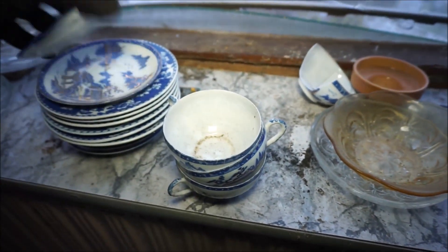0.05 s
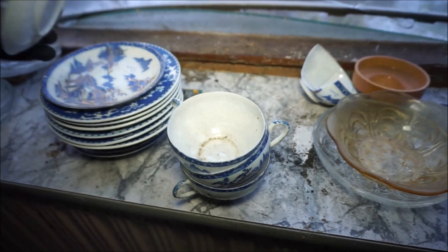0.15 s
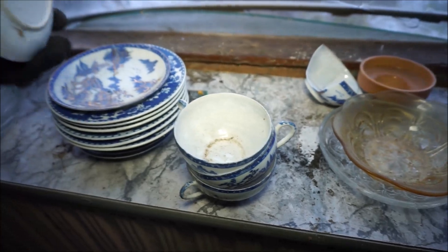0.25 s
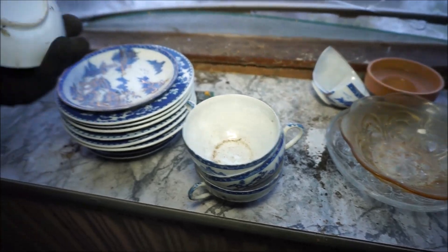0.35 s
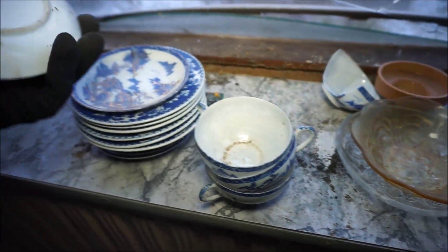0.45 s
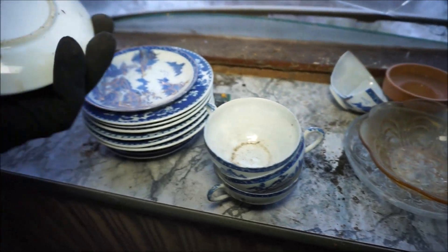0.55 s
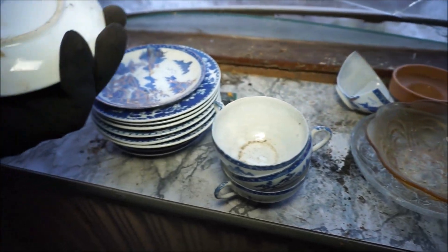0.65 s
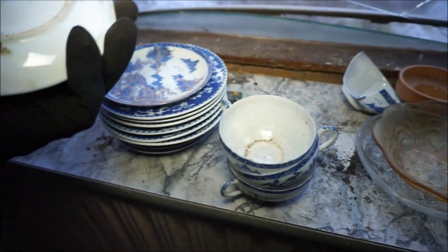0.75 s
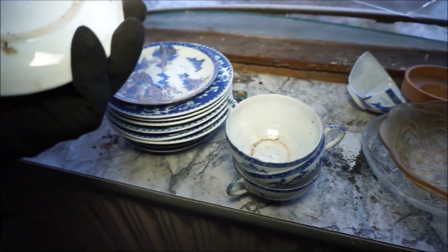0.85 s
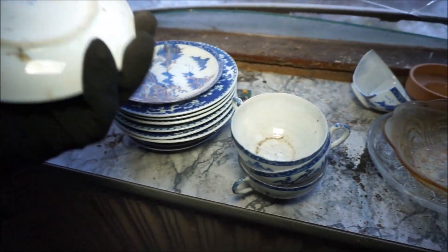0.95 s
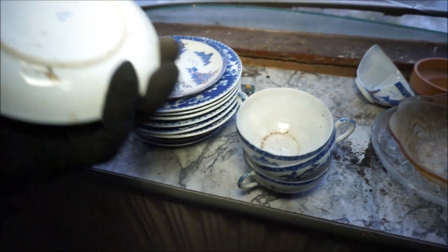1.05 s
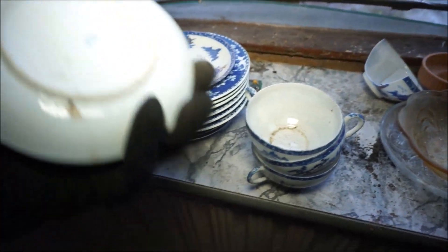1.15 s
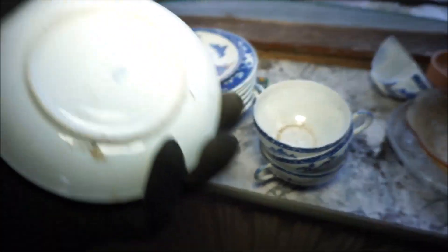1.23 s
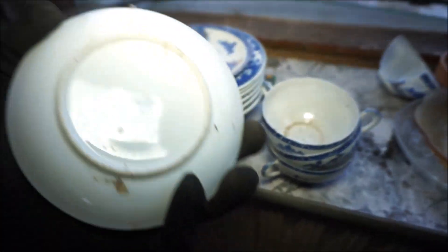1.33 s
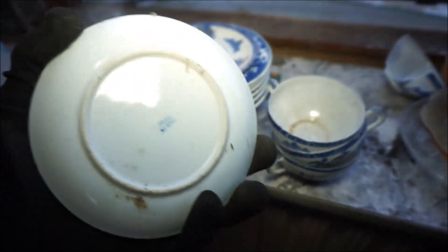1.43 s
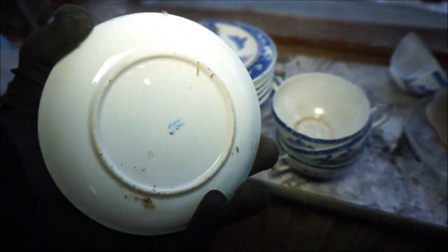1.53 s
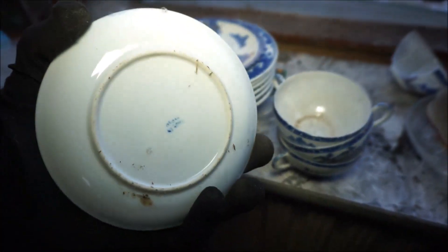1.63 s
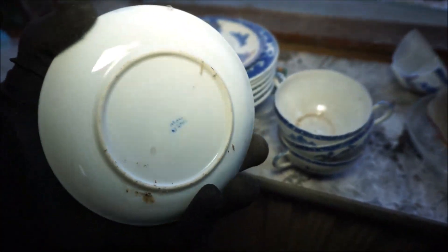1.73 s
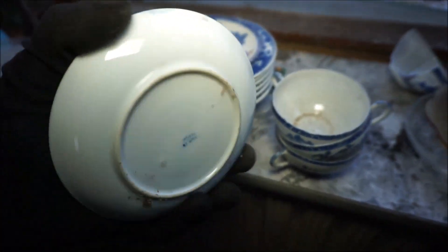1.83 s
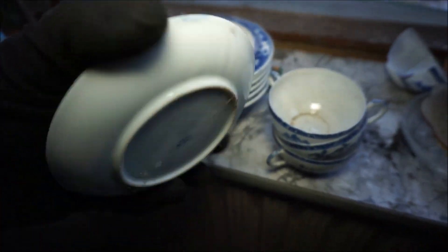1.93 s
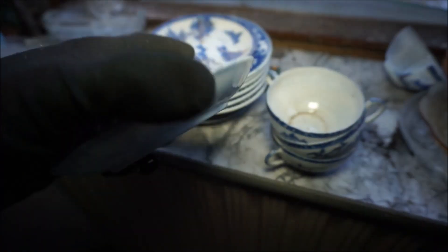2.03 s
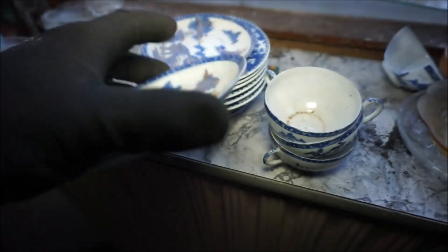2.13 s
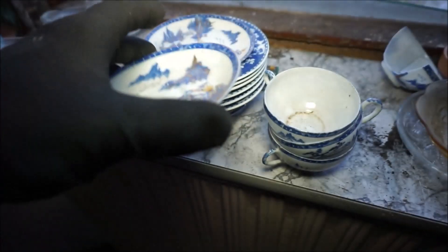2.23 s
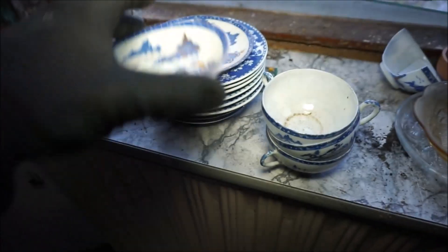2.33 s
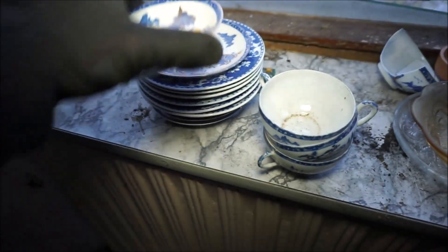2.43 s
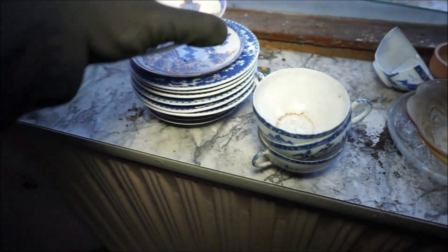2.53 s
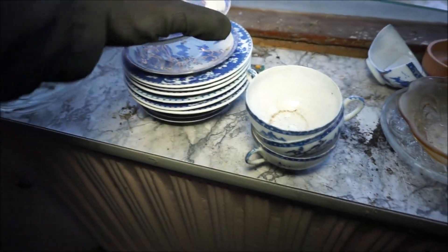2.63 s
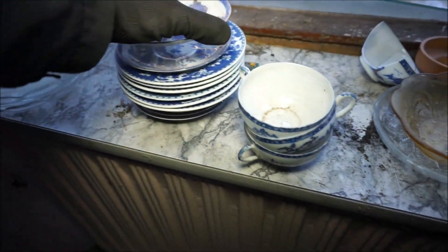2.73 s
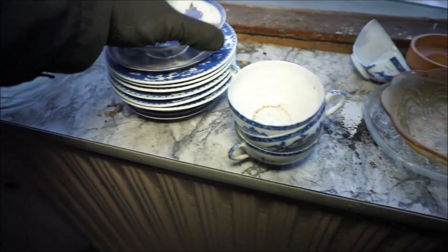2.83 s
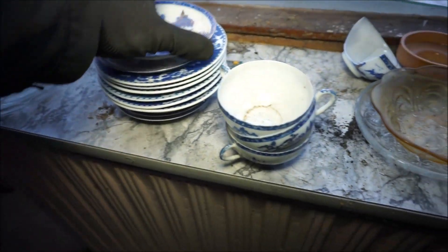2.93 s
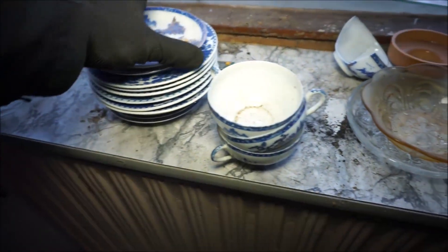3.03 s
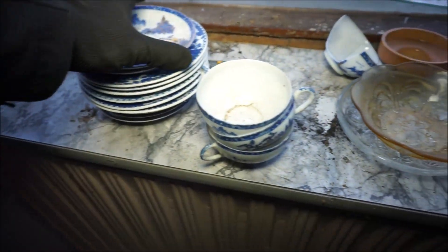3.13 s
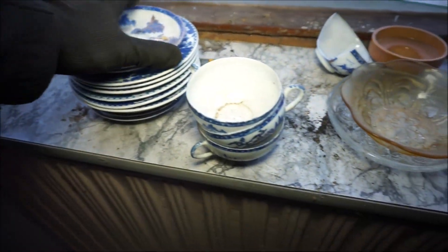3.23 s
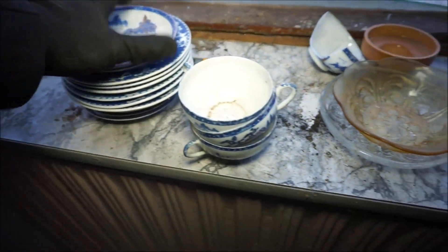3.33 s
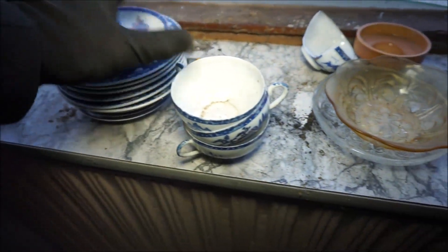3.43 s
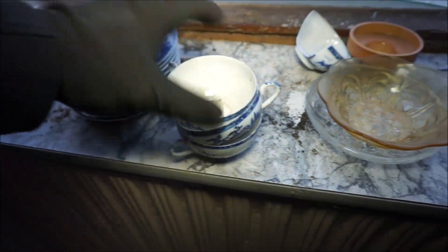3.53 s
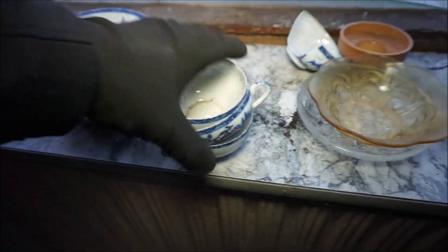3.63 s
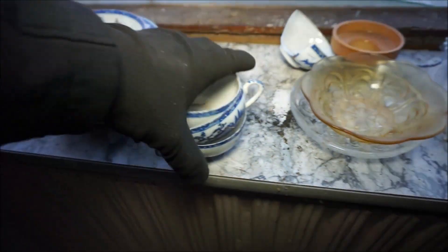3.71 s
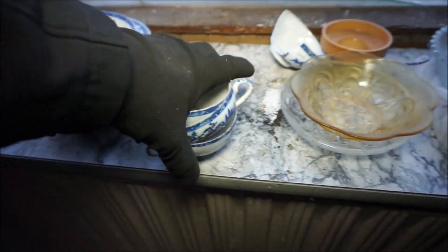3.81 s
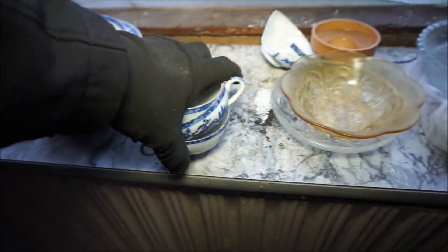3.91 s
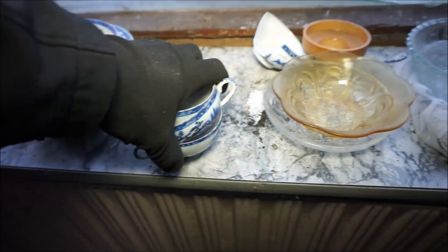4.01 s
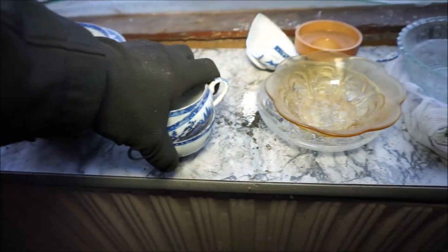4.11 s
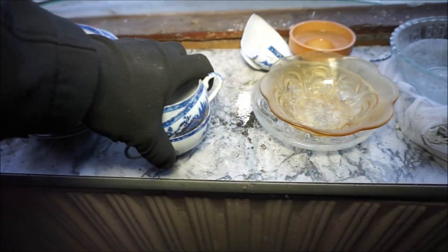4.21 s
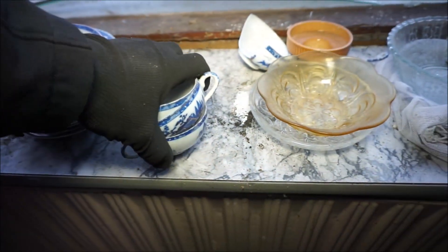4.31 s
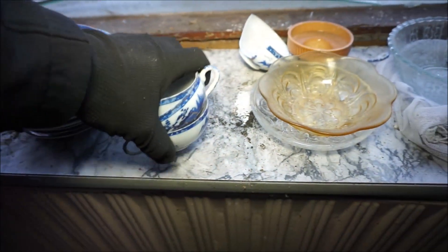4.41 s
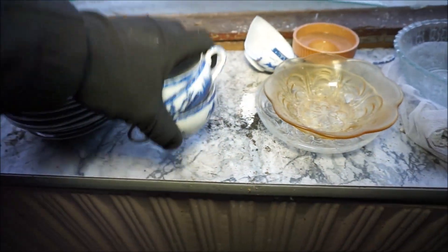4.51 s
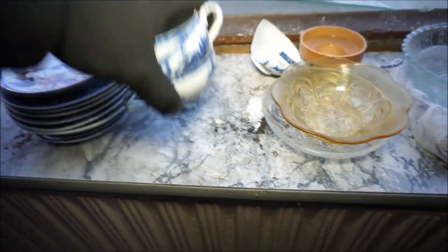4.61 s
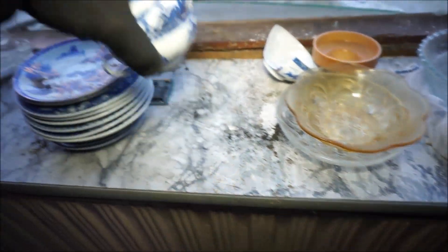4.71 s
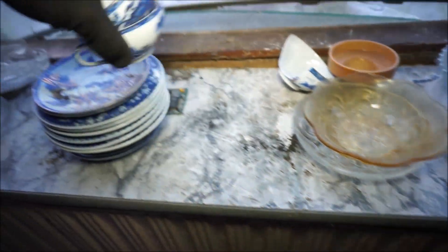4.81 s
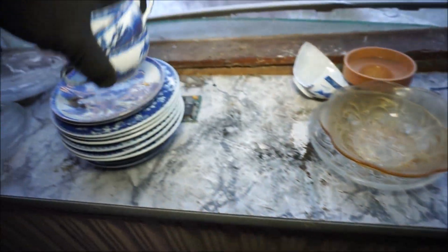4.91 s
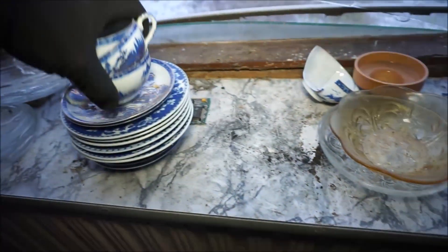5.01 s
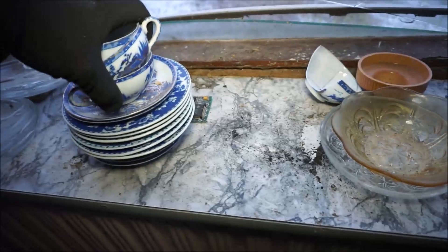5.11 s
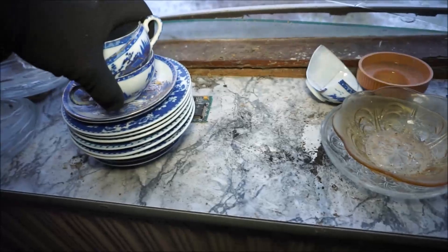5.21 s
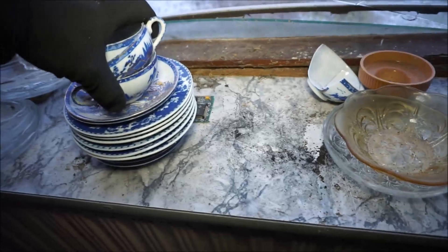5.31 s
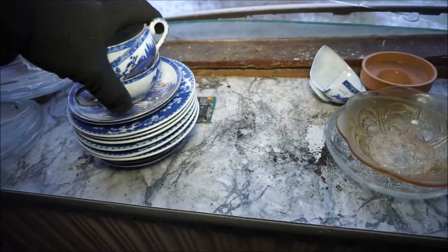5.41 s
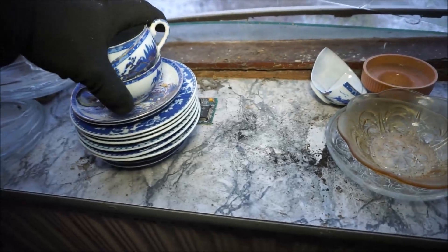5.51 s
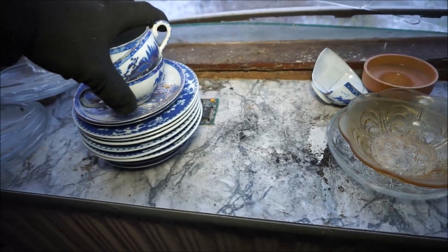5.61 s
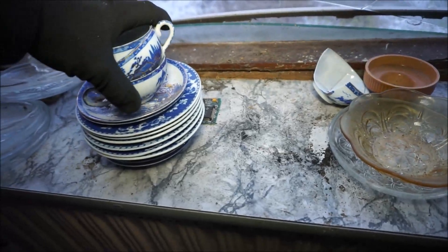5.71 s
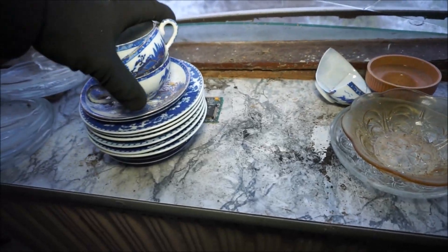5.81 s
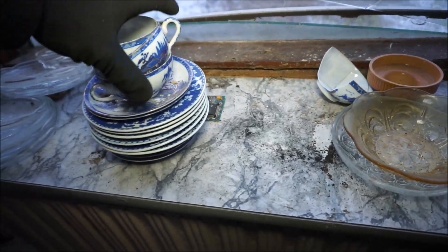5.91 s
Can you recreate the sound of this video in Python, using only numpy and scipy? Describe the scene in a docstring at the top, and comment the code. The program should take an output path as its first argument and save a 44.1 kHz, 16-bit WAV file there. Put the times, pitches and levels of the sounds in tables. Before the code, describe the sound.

A quiet small room with a faint steady hush, heard close in stereo, china and sleeve leaning slightly left. At 0 s a saucer leaves its stack with a light knock and a clear ring near 2.5 kHz, slightly shimmering, fading within half a second. A sharp dry tick falls at 0.5 s, with fainter ones around it. Cloth swishes softly and airily, around 0.3 and 1.1 s, strongest near 2 s and again at 2.6 s. From 3.0 to 3.3 s the saucer rattles back in fast hard choked clacks, with low counter rumble. A sleeve rub and tick come at 3.5 s; from 3.7 to 4.15 s a cup grinds and clatters out of its nest, dry and short. Near-quiet follows, with a slight cloth rustle at 4.8 s. At 5.07 s the cup lands, scrapes briefly and rocks in bright clinks, strongest around 5.2 s, getting softer and sparser until 5.8 s, with a last sleeve swish.

```python
"""Old porcelain on marble

A gloved hand handles old porcelain on a marble counter in a small room: a saucer rings as it leaves its stack,
is turned over with a swish of the sleeve and rattles back; a cup is pulled from a nest of cups, slides onto the
top saucer and rocks to rest. Blows and slides excite damped modes (modal synthesis); sleeve, counter rumble,
snaps and hush are filtered noise."""
import sys
import numpy as np
from scipy import signal
from scipy.fft import rfft, irfft
from scipy.io import wavfile
from scipy.ndimage import uniform_filter1d

SR = 44100
rng = np.random.default_rng(int(sys.argv[2]) if len(sys.argv) > 2 else 0)


def transcribe(signal):
    """Save signal, clipped to [-1, 1], as a 16-bit WAV file at the path in sys.argv[1]."""
    frames = np.atleast_2d(signal).T
    limited = np.clip(frames, -1, 1)
    pcm = np.round(limited * 32767).astype(np.int16)
    wavfile.write(sys.argv[1], SR, pcm)


N = 262483
TIME = np.arange(N) / SR  # s
RING_TIME = TIME[:SR * 2 // 5]  # s, length of one blow
CUT_HZ = 16100  # upper limit of the sound


def amp(db):
    """Logarithmic level: decibels to amplitude gain."""
    return 10 ** (np.asarray(db) / 20)


def unit(x):
    """Normalisation of power: scales to rms 1."""
    return x / np.sqrt(np.mean(x ** 2) + 1e-20)


def read(points, hz):
    """Logarithmic pitch axis: interpolates a table of frequency and value."""
    f, value = np.transpose(points)
    return np.interp(np.log(hz + 1), np.log(f + 1), value)


def colour(x, points):
    """Spectral shaping: weights each frequency by a table of Hz and dB."""
    hz = np.fft.rfftfreq(x.shape[-1], 1 / SR)
    return irfft(rfft(x) * amp(read(points, hz)), x.shape[-1])


def band(x, lo, hi, order=3):
    """Causal filtering: a Butterworth band-pass between two frequencies in Hz."""
    return signal.sosfilt(signal.butter(order, [lo, hi], "band", fs=SR, output="sos"), x)


def noise(count, likeness):
    """Interchannel correlation: stereo white noise with channels alike from 0 to 1."""
    a, b = rng.standard_normal((2, count))
    return np.array([a, likeness * a + np.sqrt(1 - likeness ** 2) * b])


def pan(db):
    """Level stereophony: gains that make the left louder than the right by db."""
    return amp([[db / 2], [-db / 2]])


def add(mix, s, sound):
    """Superposition: sums a stereo sound into the mix at s seconds."""
    part = mix[:, max(round(s * SR), 0):][:, :sound.shape[1]]
    part += sound[:, :part.shape[1]]


def stroke(start, end, db, rise, fall):
    """Exponential envelope: each stroke swells, holds and dies away, in dB per second."""
    gain = 0
    for a, b, level in zip(start, end, db):
        before, after = np.maximum(a - TIME, 0), np.maximum(TIME - b, 0)
        gain = gain + amp(level - rise * before - fall * after)
    return gain


# Spectrum of the hush. Each row: frequency in Hz, relative level in dB.
AIR_COLOUR = [(18, -56), (30, -50), (71, -23), (208, -16), (292, -10), (341, -12), (606, -6.5), (970, -5),
              (1330, -5.5), (2130, -14), (2620, -16), (4660, -15.5), (11000, -10.5), (15500, -14.5)]


def air(level_db=-62.5, treble_db=1.0):
    """Stationary noise: the steady hush of the empty house, with a final tilt of the treble."""
    hush = unit(colour(noise(N, 0.083), AIR_COLOUR))
    return amp(level_db) * colour(hush, [(1200, 3.44), (3000, treble_db)])


# Moves of the arm. Each row: time of top speed in seconds, half-length to 1/e in seconds, relative speed in dB.
ARM_MOVES = [(0.317, 0.33, -9.5), (1.09, 0.13, -11), (1.348, 0.16, -18), (2, 0.21, -1.5),
             (2.568, 0.24, -4.5), (3.5, 0.24, -8.5), (4.02, 0.27, -15.5), (4.807, 0.24, -16),
             (5.78, 0.14, -9.5)]
ARM_REST_DB = -20  # the arm is never quite still
ARM_FLATNESS = 2.25  # 2 is a plain bell; more holds the top speed longer
# Spectrum of cloth on cloth. Each row: frequency in Hz, relative level in dB.
SLEEVE_COLOUR = [(59, -61), (100, -42), (300, -12.5), (403, -10.5), (519, -18), (774, -4), (917, -8),
                 (1130, -3), (1550, -6.5), (2580, -3), (6390, -7.5), (9540, 3.5), (15500, 7)]


def sleeve(swish_db=-48.5, fizz_db=-49.0, fizz_growth=0.97, grain_db=0.6, split_hz=7000, side_db=6.0):
    """Friction noise: cloth gives a broad swish with arm speed and a fibre fizz that grows slightly less."""
    moves = [amp(db) * np.exp(-abs((TIME - s) / half) ** ARM_FLATNESS) for s, half, db in ARM_MOVES]
    speed = np.sqrt(amp(ARM_REST_DB) ** 2 + np.sum(np.square(moves), axis=0))
    grain = unit(uniform_filter1d(rng.standard_normal(N), size=120))
    rub = colour(noise(N, 0.18), SLEEVE_COLOUR) * amp(grain_db * grain)
    broad = unit(band(rub, 65, split_hz, order=4)) * amp(swish_db) * speed
    fine = unit(band(rub, split_hz, 15200, order=4)) * amp(fizz_db) * speed ** fizz_growth
    return broad * pan(side_db / 2) + fine * pan(side_db)


# A pile wobbles while the hand presses on it.
# Each row: start in seconds, end in seconds, level in dB before the common offset.
WOBBLES = [(0, 0.012, -53), (3.007, 3.042, -50.5), (3.12, 3.2, -54), (3.255, 3.32, -51),
           (3.693, 3.943, -58), (4.812, 4.825, -67.5), (5.064, 5.162, -49.5), (5.47, 5.64, -69)]
WOBBLE_RISE, WOBBLE_FALL = 1200, 166  # dB per second
# Response of the counter, shared with the thuds. Each row: frequency in Hz, relative level in dB.
COUNTER_COLOUR = [(30, -15), (90, -19), (150, -5), (230, 0), (330, 0.5), (480, 3.5), (620, 1.5), (900, -64),
                  (2000, -74)]


def wobble(offset_db=2.5):
    """Structure-borne sound: the pile rocks on the counter as a low rumble."""
    rocking = stroke(*np.transpose(WOBBLES), WOBBLE_RISE, WOBBLE_FALL)
    return unit(colour(noise(N, 0.93), COUNTER_COLOUR)) * rocking * amp(offset_db)


# Small dry ticks under the glove. Each row: start in seconds, level in dB before the common offset.
TICKS = [(0.238, -41), (0.5216, -23.5), (0.602, -41), (1.753, -47), (3.5868, -36)]
# Spectrum of a tick. Each row: frequency in Hz, relative level in dB.
TICK_COLOUR = [(300, -93), (2000, -2), (7000, -1), (11000, 7.5), (16000, 9)]


def ticks(offset_db=-4.0, snap_s=.0006, tail_db=-0.5, tail_s=0.0075):
    """Impulsive noise: sharp snaps with two exponential decays and no ring."""
    out, t = np.zeros((2, N)), TIME[:SR // 10]
    shape = np.exp(-t / snap_s) + amp(tail_db) * np.exp(-t / tail_s)
    for s, db in TICKS:
        snap = unit(colour(noise(len(t), 0.36), TICK_COLOUR))
        add(out, s, amp(db + offset_db) * shape * snap)
    return out * pan(5.9)


# Modes of the lifted saucer. Each row: frequency in Hz, relative level in dB, 60 dB decay time in seconds.
FREE_SAUCER_MODES = [(2520, 0, .46), (4005, -14, .36), (5523, -26, .2), (5615, -28, .24), (7848, -26, .25),
                     (10004, -20, .11)]


def free_saucer(level_db=-19.5, split_hz=15.8, twin_db=-17.0, upper_twin_db=-4.5):
    """Mode splitting: lifted clear, the saucer rings long and its slightly oval rim makes the modes beat."""
    t, out = TIME[:SR], np.zeros((2, N))
    onset = 1 - np.exp(-t / 0.00018)
    for k, (hz, db, t60) in enumerate(FREE_SAUCER_MODES):
        phase = rng.uniform(0, 2 * np.pi) + 0.37 * rng.standard_normal((2, 1))
        main = np.sin(2 * np.pi * hz * t + phase)
        twin = np.sin(2 * np.pi * (hz * t + split_hz * (t - .022)) + phase)
        pair = main + amp(upper_twin_db if k else twin_db) * twin
        add(out, 0, amp(level_db + db - 60 * t / t60) * pair * onset)
    return out * pan(6.4)


def ringing(modes, spot_db=3.0, split=0.00726, port_spread=0.59, held=0.51, free_db=7.0, grip_hz=45):
    """Modal superposition: each mode is a close pair, one choked by the contact, one ringing on."""
    hz, db, t60 = np.transpose(modes)[:, :, None]
    t = RING_TIME[:SR // 4].astype(np.float32)
    out = np.zeros((2, len(RING_TIME)))
    choked = (t60 * held, 0, 2 * split * hz + grip_hz)
    free = (t60, free_db, split * hz / 2 + grip_hz / 4)
    for life, level_db, scatter_hz in (choked, free):
        weight, shift, phase, port = rng.standard_normal((4, len(modes), 1))
        # the spot struck favours some modes and the pressure detunes them
        size = amp(db + level_db + spot_db * weight) / np.sqrt(life)
        turn = (2 * np.pi * (hz + scatter_hz * shift)).astype(np.float32) * t
        decay = np.exp(-np.minimum((np.log(1000) / life).astype(np.float32) * t, 20))
        # left and right phases part further towards the treble
        start = np.pi * phase + np.hstack([port, -port]) * port_spread * np.sqrt(hz / (hz + 4000))
        out[:, :len(t)] += (size * np.cos(start)).T @ (decay * np.sin(turn))
        out[:, :len(t)] += (size * np.sin(start)).T @ (decay * np.cos(turn))
    return out / np.linalg.norm(out)


# Spectrum of the dense damped modes of a pile. Each row: frequency in Hz, relative level in dB.
CLACK_COLOUR = [(500, -28), (900, 1.5), (1500, 5.5), (2000, 1), (3200, 8), (4200, 2), (7000, -2.5),
                (15000, 1.5)]
# Edges of the low, middle and high bands. Each entry: frequency in Hz.
BAND_EDGES = [650, 2200, 8000, 16000]
SLIDE_RISE, SLIDE_FALL = 242, 149  # dB per second


def slide(rows, modes, grains_per_s=18000, grain_db=3.0, rough_db=5.0):
    """Stick-slip friction: unglazed rims and grit catch in tiny slips that excite the same modes."""
    start, end, grind_db, hiss_db = np.transpose(rows)
    caught = rng.random(N) < grains_per_s / SR
    slips = caught * noise(N, 0.62) * amp(grain_db * np.minimum(rng.exponential(1, N), 4))
    rung = unit(signal.oaconvolve(slips[:1], ringing(modes), axes=1)[:, :N])
    rub = rung + amp(rough_db) * unit(colour(slips, CLACK_COLOUR))
    grind = unit(band(rub, *BAND_EDGES[:2])) * stroke(start, end, grind_db, SLIDE_RISE, SLIDE_FALL)
    hiss = unit(band(rub, BAND_EDGES[1], CUT_HZ)) * stroke(start, end, hiss_db, SLIDE_RISE, SLIDE_FALL)
    return grind + pan(1.4) * hiss


def contact(chatter, touch=1.0, count=12):
    """Repeated impact: a first touch, then micro-bounces that swell as the rim digs in and die away."""
    delay = 3 * (np.arange(count) + rng.random(count)) / count  # in chatter times
    bounce = rng.choice([-1, 1], count) * 2 * delay * np.exp(1 - 2 * delay)
    force = np.zeros(round(3 * chatter * SR) + 2)
    force[0] = touch
    np.add.at(force, (delay * chatter * SR).astype(int), bounce)
    return force[None]


FOCUS = 0.33  # dB off knock and sparkle per dB of hardness away from medium: the middle modes stand out


def blows(rows, modes, clack_db, clack_t60, ring_on_db, knock_db, ring_db, sparkle_db, thud_db, thud_low_hz,
          side_db, thud_t60=0.17):
    """Impact excitation: each blow rings the modes, clacks through the pile and bumps the counter."""
    out, attack = np.zeros((2, N)), round(.012 * SR)
    for s, ring, hardness, chatter in rows:
        # hardness tilts the blow from the low knock towards the high sparkle
        knock = ring - FOCUS * abs(hardness) - hardness / 2
        sparkle = ring - FOCUS * abs(hardness) + hardness / 2
        clack = colour(noise(len(RING_TIME), 0.39), CLACK_COLOUR) * amp(-60 * RING_TIME / clack_t60)
        body = ringing(modes, free_db=ring_on_db) + amp(clack_db) * clack / np.linalg.norm(clack)
        body = signal.fftconvolve(body, contact(chatter), axes=1)
        # a soft contact cannot drive the treble
        top_hz = np.clip(CUT_HZ * amp(.7 * (sparkle - ring)), 4000, CUT_HZ)
        body = band(body, 300, top_hz, order=2)
        # each band is set by the strength of its attack
        levels = (knock + knock_db, ring + ring_db, sparkle + sparkle_db)
        for lo, hi, db in zip(BAND_EDGES, BAND_EDGES[1:], levels):
            part = band(body, lo, hi)
            side = pan(side_db * min(hi / 7000, 1))
            add(out, s, amp(db) * side * part / part[:, :attack].std())
        # the thud follows the knock; a lighter pile cannot push the counter's lowest modes
        bump = unit(band(colour(noise(len(RING_TIME), 1.0), COUNTER_COLOUR), thud_low_hz, 870, order=1))
        onset = 1 - np.exp(-RING_TIME / 0.00029)
        add(out, s, amp(knock + thud_db - 60 * RING_TIME / thud_t60) * bump * onset)
    return out


# Blows of the saucer on its stack. Each row: start in seconds, strength in dB before the band levels,
# hardness as sparkle over knock in dB, chatter time in seconds.
SAUCER_BLOWS = [(0.001, -36.5, -6, 0.0072), (0.014, -58, -45, 0.0052), (2.997, -30, -17.5, .0045),
                (3.041, -28, 5.5, 0.002), (3.084, -33, 2, 0.0018), (3.112, -29.5, 2, 0.0022),
                (3.117, -24.5, -4, 0.002), (3.18, -27.5, 11.5, 0.0015), (3.1945, -24.5, 0, .0013),
                (3.244, -41, 48, .003), (3.25, -36, -38, .0025), (3.313, -51.5, -6, 0.0041)]
# Glaze sliding on glaze. Each row: start in seconds, end in seconds, grinding in dB, hiss in dB.
SAUCER_SLIDES = [(0, 0.02, -44.5, -47), (3.19, 3.27, -45.5, -69)]
# Modes of the stack. Each row: central frequency in Hz, relative level in dB, free 60 dB decay time in seconds.
STACK_MODES = [(840, -11, 0.09), (1130, -7, 0.06), (1276, 0, 0.07), (1437, -2, 0.09), (1577, 0, 0.09),
               (1965, -12, 0.07), (2568, -4, 0.12), (2875, -5, 0.09), (3741, -8, 0.09), (4037, -2, 0.26),
               (4247, -9, 0.06), (4500, -8, 0.06), (5857, -5, 0.08), (6062, -11, 0.06), (6498, -11, 0.09),
               (7359, -9, 0.06), (7757, -2, 0.06), (8247, -9, 0.09), (9765, -6, 0.07), (9964, -8, 0.1),
               (11176, -15, 0.08), (11789, -11, 0.1), (12112, -3, 0.06), (12489, -2, 0.05),
               (13211, -5, 0.06), (13480, -12, 0.06), (14696, -1, 0.06)]


def saucer_on_stack():
    """Coupled damping: the saucer leaves its stack and rattles back, its modes choked by the pile."""
    rattle = blows(SAUCER_BLOWS, STACK_MODES, clack_db=-8.5, clack_t60=0.061, ring_on_db=-9.5,
                   knock_db=-0.7, ring_db=-1.4, sparkle_db=-0.3, thud_db=-18.0, thud_low_hz=95.6, side_db=3.0)
    return rattle + slide(SAUCER_SLIDES, STACK_MODES)


# Blows of the cup in its nest. Each row: start in seconds, strength in dB before the band levels,
# hardness as sparkle over knock in dB, chatter time in seconds.
NEST_BLOWS = [(3.699, -40.5, 1, 0.0018), (3.731, -35.5, 12, 0.0014), (3.739, -33, 35, .003),
              (3.771, -22, 20, .0025), (3.807, -31.5, 10, 0.00094), (3.847, -29, 4, 0.0035),
              (3.862, -25.5, 4.5, 0.0011), (3.942, -36.5, 6, 0.0008), (3.959, -45.5, 23, .002),
              (3.993, -70, 16, 0.0013), (4.083, -47, 5, 0.0021), (4.108, -35, 3.5, .001),
              (4.118, -29.5, -2, 0.0023), (4.15, -39, 3.5, 0.0073)]
# Glaze sliding on glaze. Each row: start in seconds, end in seconds, grinding in dB, hiss in dB.
NEST_SLIDES = [(3.73, 3.88, -44.5, -42.5), (4.135, 4.16, -50, -56)]
# Modes of the nest. Each row: central frequency in Hz, relative level in dB, free 60 dB decay time in seconds.
NEST_MODES = [(790, -6, 0.07), (883, 0, 0.09), (990, -4, 0.08), (1421, -12, 0.07), (1572, -17, 0.07),
              (1857, -20, 0.07), (2191, -13, 0.07), (2815, -12, 0.09), (3332, -9, 0.09), (3688, -10, 0.09),
              (4005, -11, 0.06), (4280, -13, 0.09), (4700, -11, 0.08), (5157, -7, 0.06), (5330, -9, 0.07),
              (6659, -15, 0.06), (8393, -11, 0.06), (8651, -14, 0.06), (9464, -10, 0.06),
              (10632, -10, 0.06), (10950, -8, 0.06), (11838, -8, 0.05), (12301, -9, 0.06),
              (12656, -7, 0.09), (13388, -13, 0.06), (14804, -9, 0.05), (15569, 0, 0.06)]


def cup_in_nest():
    """Coupled damping: a cup is pulled out of touching cups, with a strong clack and a short ring."""
    clatter = blows(NEST_BLOWS, NEST_MODES, clack_db=-1.0, clack_t60=0.029, ring_on_db=-6.0,
                    knock_db=2.0, ring_db=-4.5, sparkle_db=-2.4, thud_db=-21.0, thud_low_hz=233, side_db=1.0)
    return clatter + slide(NEST_SLIDES, NEST_MODES)


# Blows of the cup on the saucer. Each row: start in seconds, strength in dB before the band levels,
# hardness as sparkle over knock in dB, chatter time in seconds.
CUP_BLOWS = [(4.812, -62, -17, 0.0037), (5.071, -27, 0, 0.0016), (5.092, -37.5, -4, 0.004),
             (5.115, -36, -18, .006), (5.174, -27.5, 13, 0.0012), (5.243, -25, 9.5, .0015),
             (5.271, -31.5, 8.5, .002), (5.361, -38, 18, 0.0031), (5.377, -38, 9.5, 0.0023),
             (5.402, -39, 7.5, .0015), (5.436, -47, 22, 0.0025), (5.456, -38.5, 7, 0.0027),
             (5.466, -31.5, 1.5, .003), (5.507, -32.5, 4, .0015), (5.525, -34, 4, .0015),
             (5.603, -43, 7.5, 0.0027), (5.717, -43, 9, .002), (5.733, -35.5, 5.5, 0.0047),
             (5.811, -36, 6.5, 0.0037)]
# Glaze sliding on glaze. Each row: start in seconds, end in seconds, grinding in dB, hiss in dB.
CUP_SLIDES = [(5.04, 5.17, -48, -38), (5.39, 5.54, -52, -55)]
# Modes of the cup. Each row: central frequency in Hz, relative level in dB, free 60 dB decay time in seconds.
CUP_MODES = [(861, -3, 0.09), (990, -6, 0.06), (1136, -11, 0.07), (1518, -8, 0.09), (1739, -9, 0.09),
             (1911, -15, 0.09), (2509, -8, 0.13), (3408, -6, 0.06), (3763, -5, 0.09), (4021, -11, 0.17),
             (4334, -16, 0.09), (5561, -5, 0.1), (5852, -2, 0.1), (6105, -6, 0.1), (6325, -6, 0.09),
             (8000, -10, 0.09), (8253, -6, 0.1), (10234, -4, 0.1), (10541, -4, 0.11), (10799, -7, 0.09),
             (11574, -13, 0.08), (11827, -6, 0.07), (12457, -5, 0.08), (13227, 0, 0.08), (14632, -19, 0.11),
             (15719, -8, 0.08)]


def cup_on_saucer():
    """Rocking contact: the cup slides onto the top saucer and comes to rest in a run of blows."""
    rocking = blows(CUP_BLOWS, CUP_MODES, clack_db=-4.0, clack_t60=0.022, ring_on_db=-3.0,
                    knock_db=2.44, ring_db=-0.66, sparkle_db=0.4, thud_db=-19.0, thud_low_hz=170, side_db=3.5)
    return rocking + slide(CUP_SLIDES, CUP_MODES)


# Reverberation of the room. Each row: frequency in Hz, 60 dB decay time in seconds.
ROOM_DECAY = [(150, 0.99), (1000, 0.3), (4000, .28), (15000, 0.23)]


def room(x, early_db=-13.5, tail_db=-10.5, count=8):
    """Reverberation: counter, sill and window throw back early echoes; the small room adds a short tail."""
    early = np.zeros((2, SR // 2))
    at = (rng.uniform(0.0022, 0.014, (2, count)) * SR).astype(int)
    np.put_along_axis(early, at, rng.choice([-1., 1.], at.shape) / np.sqrt(count), 1)
    # noise whose frequencies die away at their own rates
    hz, t, z = signal.stft(noise(SR // 2, 0.49), SR, nperseg=256)
    decay = amp(-60 * t / read(ROOM_DECAY, hz)[:, None]) * (1 - np.exp(-t / 0.0019))
    tail = signal.istft(z * decay, SR, nperseg=256)[1][:, :SR // 2]
    echo = amp(early_db) * early + amp(tail_db) * tail / np.linalg.norm(tail[0])
    return x + signal.oaconvolve(x, echo, axes=1)[:, :N]


def scene():
    """Superposition: the china and ticks sound in the room; the other layers are added dry."""
    china = saucer_on_stack() + cup_in_nest() + cup_on_saucer()
    return air() + sleeve() + wobble() + free_saucer() + room(china + ticks())


def record(dry):
    """Band limitation: the recorder trims deep bass and the very top."""
    trimmed = signal.sosfilt(signal.butter(1, 45, "high", fs=SR, output="sos"), dry)
    low_pass = signal.firwin(511, CUT_HZ, window=("kaiser", 8), fs=SR)
    return signal.oaconvolve(trimmed, low_pass[None], "same")


dry = scene()
out = record(dry)
transcribe(out)
```